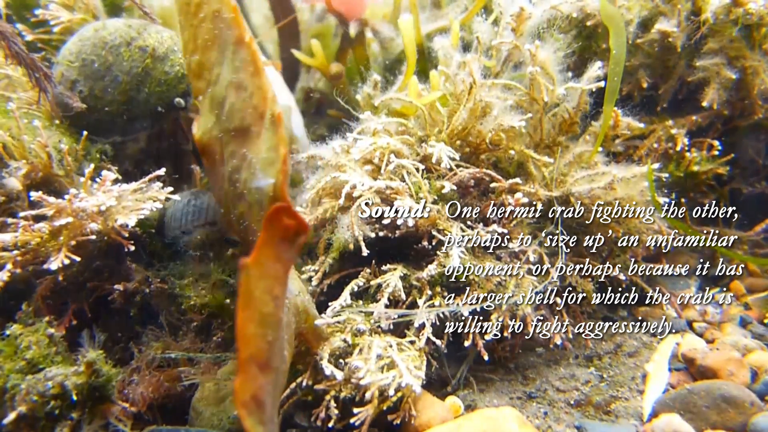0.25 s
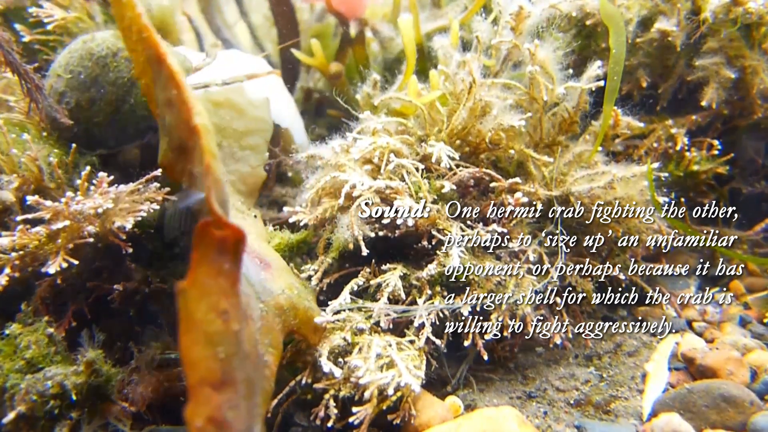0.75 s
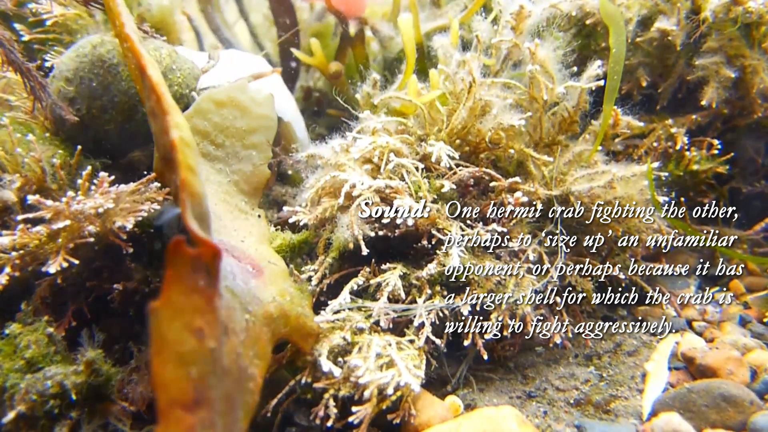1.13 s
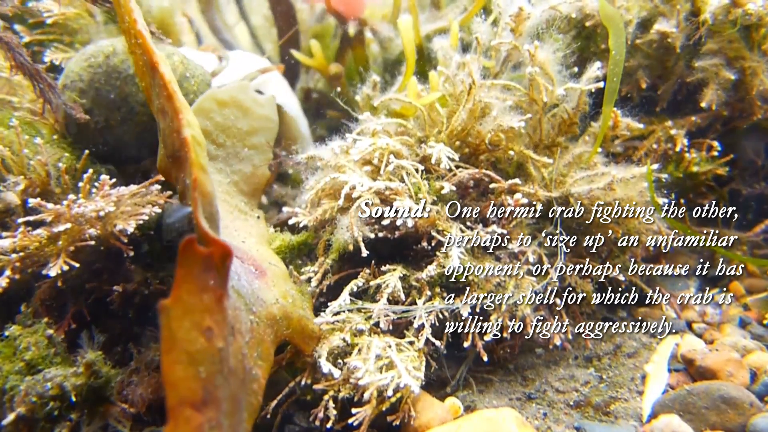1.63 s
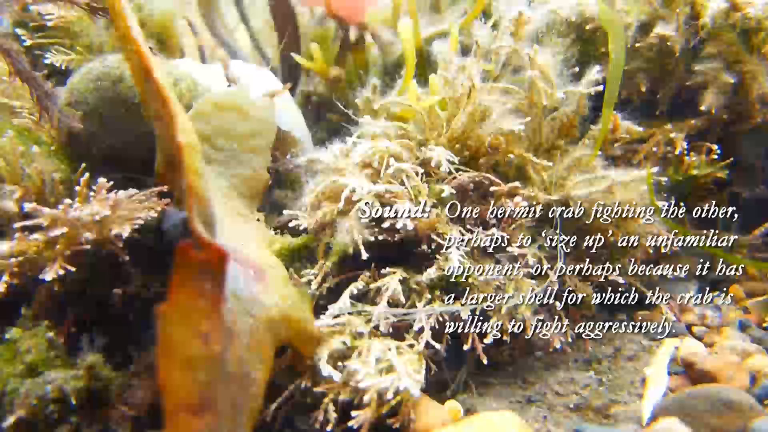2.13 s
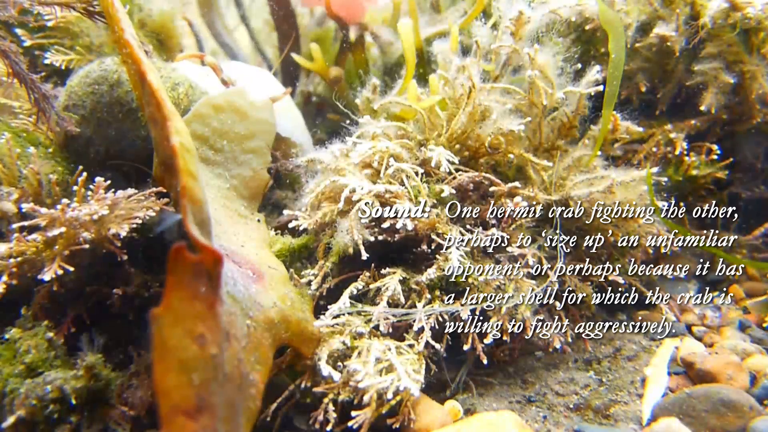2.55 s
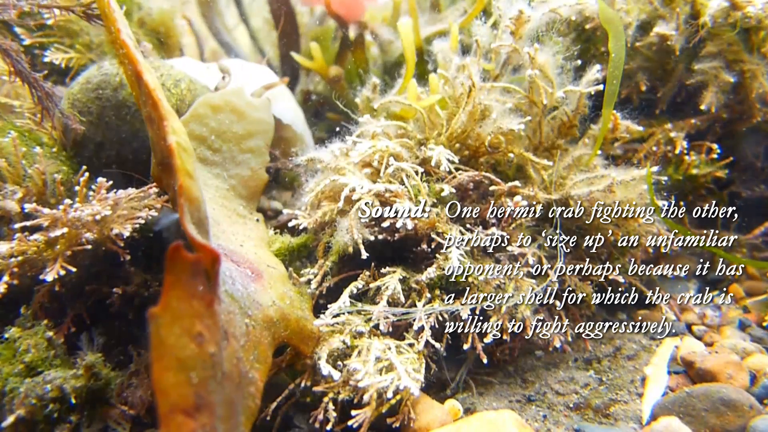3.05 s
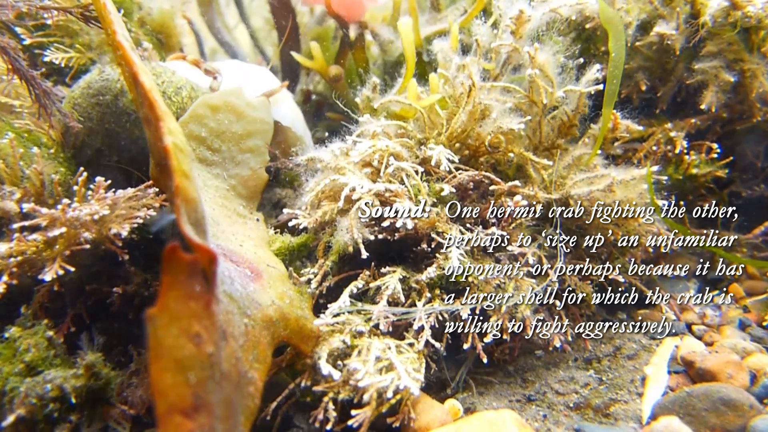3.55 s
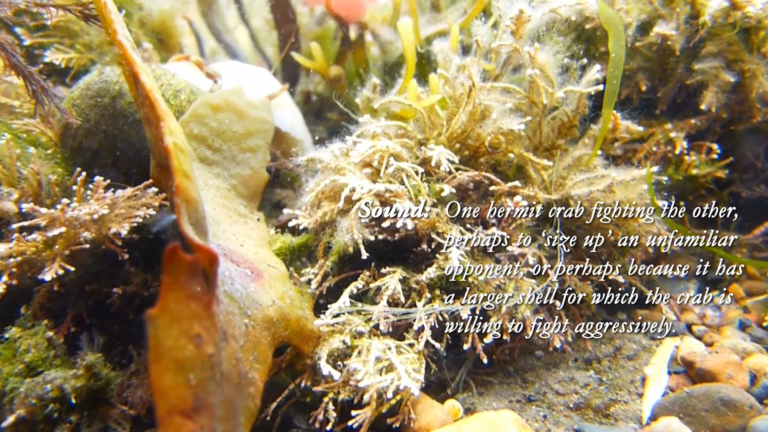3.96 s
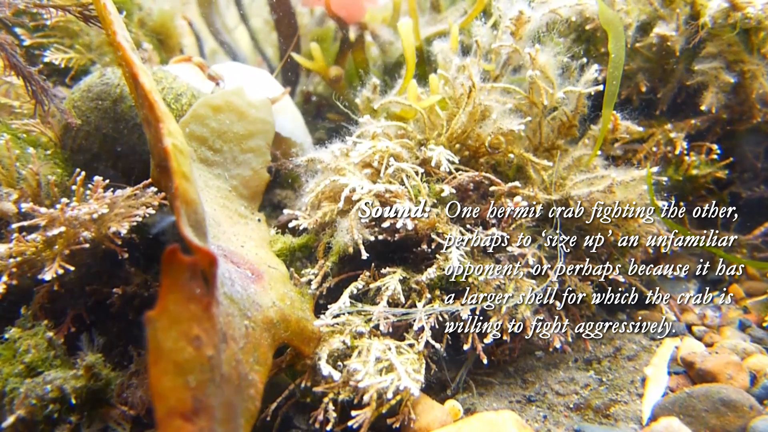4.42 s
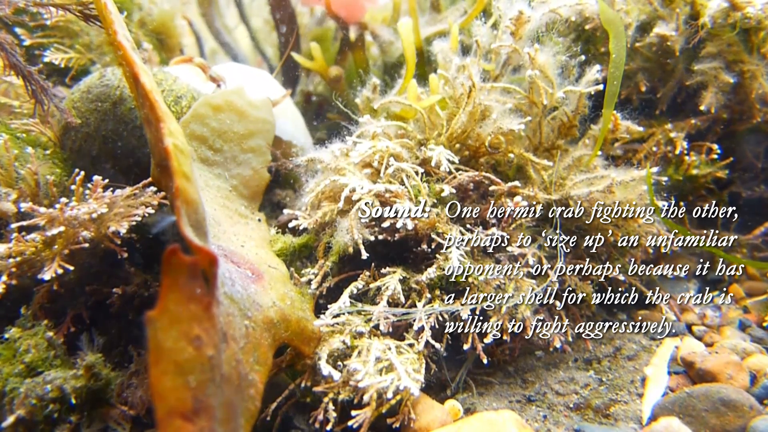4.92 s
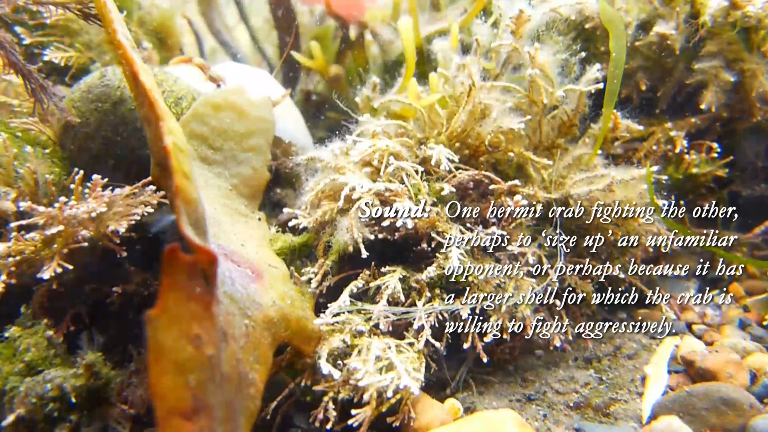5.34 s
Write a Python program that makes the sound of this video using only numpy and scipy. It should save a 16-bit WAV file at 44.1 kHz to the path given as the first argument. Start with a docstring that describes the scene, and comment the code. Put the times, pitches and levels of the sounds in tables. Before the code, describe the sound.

Sharp irregular clicks and taps of small hard shells knocking underwater, with faint leg scrapes over low water rumble and steady hiss.

```python
"""Small crabs wrestle in a rock pool, heard through an underwater microphone lying close by.
From the start: noise-made rumble and water, faint stirring of legs, electronic hiss with a breathy band.
Soon claws and borrowed shells tap (damped modes, often in quick clusters) and crack (clicks with noisy tails);
shoves send dull sagging pushes through the water, legs scrape in bouts, soft knocks ring shell hollows.
The strongest blows fall around two seconds; weaker taps and scrapes go on to the end."""
import sys
import numpy as np
from scipy import signal
from scipy.fft import rfft, irfft
from scipy.io import wavfile
from scipy.ndimage import uniform_filter1d, minimum_filter1d

SR = 44100
rng = np.random.default_rng(int(sys.argv[2]) if len(sys.argv) > 2 else 0)


def gain_from_db(level_db):
    """Convert decibel levels to linear amplitude factors (20 dB per decade)."""
    decades = np.asarray(level_db, float) / 20
    return 10 ** decades


def materialize(psi):
    """Save the field psi as 16-bit PCM at rate SR to the path in sys.argv[1].

    A 1-D psi becomes a single channel; in a 2-D psi each row is a channel.
    """
    bounded = np.clip(np.atleast_2d(psi).T, -1, 1)
    quanta = np.round(bounded * 32767).astype(np.int16)
    wavfile.write(sys.argv[1], SR, quanta)


N = 246519

# low heave of the water: start_s, level_db
SURGE_LEVELS = [(0, -43), (0.09, -58.5), (0.65, -59), (0.72, -50), (1.0, -57.5), (1.4, -62), (1.55, -55),
                (2.3, -54.5), (2.78, -66), (2.85, -53.5), (3.65, -61), (3.81, -50), (3.95, -53.5),
                (4.65, -60), (4.85, -50.5), (5.0, -62), (5.3, -58), (5.59, -61)]
# water noise: freq_hz, relative_density_db
WATER_SPECTRUM = [(350, -6.5), (815, -1), (1130, -5.5), (1330, -24), (1850, -17), (2450, -15.5),
                  (2900, -27.5)]
# bouts of legs scrabbling on shell: centre_s, length_s (falls to 1/e at 0.7 of it either side), level_db
SCRABBLE_BOUTS = [(0.226, 0.019, -48.5), (0.272, 0.011, -41), (0.317, 0.017, -51), (0.639, 0.018, -52),
                  (0.815, 0.041, -46), (1.163, 0.0074, -41.5), (1.32, 0.039, -45.5), (1.788, 0.026, -38.5),
                  (1.938, 0.024, -29), (1.988, 0.013, -39.5), (2.062, 0.029, -31.5), (2.193, 0.058, -40),
                  (2.256, 0.016, -34), (2.392, 0.026, -37.5), (2.506, 0.024, -43.5), (2.597, 0.011, -37.5),
                  (2.65, 0.078, -53.5), (2.878, 0.025, -46.5), (2.976, 0.055, -40), (3.07, 0.049, -42),
                  (3.124, 0.016, -39.5), (3.164, 0.018, -33), (3.239, 0.042, -43.5), (3.388, 0.034, -46.5),
                  (3.467, 0.026, -40.5), (3.58, 0.031, -37.5), (3.634, 0.016, -49), (3.798, 0.017, -47),
                  (3.898, 0.011, -49), (4.127, 0.035, -44.5), (4.234, 0.0077, -49), (4.428, 0.013, -41),
                  (4.583, 0.016, -49.5), (4.746, 0.025, -43.5), (4.913, 0.02, -46.5), (5.127, 0.018, -37.5),
                  (5.366, 0.027, -50), (5.554, 0.014, -38.5)]
# modes of the shell wall: freq_hz, relative_level_db, length_s (to about 70 dB under the peak)
WALL_MODES = [(1302, -0.5, 0.0057), (1790, 0, 0.0084), (2080, -2.5, 0.0061), (2326, -5.5, 0.0082),
              (2678, -7.5, 0.0078), (3050, -0.5, 0.0058)]
# modes of the shell's hollow: freq_hz, relative_level_db, length_s (as above)
HOLLOW_MODES = [(547, -12, 0.0079), (834, -1, 0.0094), (1026, -11, 0.0069)]
# preamplifier hiss: freq_hz, relative_density_db
HISS_SPECTRUM = [(300, -6.5), (3000, 1.5), (7300, 0), (15500, -1.5)]
# clear shell taps: start_s, wall_peak_db (before the microphone), ring_centre_hz
TAP_EVENTS = [(0.0685, -30, 1920), (0.1512, -29.5, 1700), (0.2806, -29, 1670), (0.3656, -15, 2160),
              (0.3811, -27, 1930), (0.388, -25.5, 1930), (0.4925, -38, 2400), (0.5604, -14.5, 2430),
              (0.588, -19, 1907), (0.78, -27.5, 1260), (0.808, -15, 1380), (0.8259, -27, 2220),
              (0.84, -27, 1350), (1.0833, -10, 2240), (1.252, -28.5, 1950), (1.2638, -9.5, 2140),
              (1.267, -12, 1970), (1.271, -14, 2080), (1.3054, -28, 2037), (1.5064, -6.5, 2220),
              (1.5969, -4.5, 2380), (1.6735, -7, 2040), (1.678, -15.5, 2000), (1.6825, -24, 1750),
              (1.7768, -19, 2410), (1.7807, -9.5, 2170), (1.784, -12.5, 2440), (1.9186, -6, 2160),
              (1.9228, -1, 2080), (1.9253, 15, 2180), (1.9302, -9, 2280), (1.9396, -12.5, 2100),
              (1.9508, -23, 1970), (1.9754, -33, 2250), (2.04, -25, 2070), (2.05, -5, 2250),
              (2.0558, -2.5, 2400), (2.0616, 8.5, 2250), (2.0662, -18, 1700), (2.069, -20, 1370),
              (2.1117, -23, 1610), (2.1319, -20, 1380), (2.1642, -8, 2080), (2.1835, -23, 2260),
              (2.2414, -21, 1390), (2.2541, -22, 1350), (2.3864, -28, 2000), (2.4215, -4, 2014),
              (2.427, -18, 1420), (2.4979, -40, 2150), (2.5811, -22, 1920), (2.597, -20, 1970),
              (2.654, -34, 2080), (2.671, -34.5, 2310), (2.8595, -23.5, 2500), (2.9569, -26, 1900),
              (2.9733, -24, 1850), (2.9777, -13.5, 1970), (2.9943, -11.5, 2230), (3.069, -16.5, 2170),
              (3.071, -23, 1890), (3.1544, -16, 2080), (3.1603, -18.5, 1930), (3.2165, -37, 1720),
              (3.2309, -30, 1740), (3.2449, -23.5, 1340), (3.3573, -14.5, 1960), (3.3724, -4.5, 2150),
              (3.469, -26, 1275), (3.4858, -3.5, 2030), (3.4946, -22.5, 2040), (3.538, -25, 1376),
              (3.566, -19, 1350), (3.5719, -18.5, 1340), (3.581, -14.5, 1970), (3.5849, -19, 2150),
              (3.6784, -20, 2010), (3.684, -11.5, 1990), (3.7968, -26, 2330), (3.8072, -32.5, 2040),
              (3.8712, -35, 1830), (3.8877, -28.5, 1480), (3.897, -24, 2230), (3.909, -29, 2000),
              (4.019, -24, 1930), (4.0231, -16, 2200), (4.0257, -17, 2020), (4.0295, -16.5, 2000),
              (4.0866, -38, 2390), (4.1077, -22.5, 2240), (4.1178, -25, 2170), (4.1265, -25.5, 1790),
              (4.1406, -24, 2000), (4.1784, -34.5, 2000), (4.2333, -35, 2080), (4.267, -24.5, 1966),
              (4.4203, -21, 2060), (4.445, -28.5, 1980), (4.576, -31, 2060), (4.7465, -16, 2060),
              (4.7527, -21, 2005), (4.8549, -33, 1560), (5.109, -23.5, 2040), (5.1175, -25.5, 1840),
              (5.133, -12.5, 2010), (5.2358, -20, 1990), (5.2534, -4, 2010), (5.3293, -30.5, 1790),
              (5.3583, -26.5, 2150), (5.3723, -32, 1790), (5.5562, -13.5, 2050), (5.568, -21, 1986),
              (5.578, -20, 1610)]
# hard edge-on contacts: start_s, peak_db (before the microphone)
CRACK_EVENTS = [(0.1517, -29.5), (0.3655, -25), (0.5612, -20), (1.0831, -16), (1.265, -22), (1.5064, -14.5),
                (1.597, -17.5), (1.6736, -23.5), (1.783, -27), (1.92, -28), (1.9315, -29), (1.958, -33),
                (2.051, -25), (2.055, -26.5), (2.064, -23), (2.1641, -26), (2.4212, -20.5), (2.9787, -18.5),
                (2.995, -26), (3.0685, -21), (3.3587, -29)]
# strong, dull shoves: start_s, peak_db (before the microphone), pitch_hz (passed about 1.2 cycles in)
SHOVE_EVENTS = [(0.164, -24.5, 122.4), (0.172, -21, 121), (0.174, -32, 327), (0.584, -29.5, 353),
                (1.176, -31.5, 260), (1.265, -27, 344), (1.93, -23, 320), (2.24, -26.5, 397),
                (2.251, -25.5, 200), (2.424, -22.5, 360), (2.845, -40, 108), (2.886, -29.5, 355),
                (3.158, -23, 373), (3.243, -26, 310), (3.286, -31.5, 285), (3.486, -31.5, 140),
                (3.594, -33, 266), (3.787, -35, 99), (3.829, -31.5, 181), (4.424, -28.5, 188),
                (4.875, -39, 125), (5.138, -27.5, 274), (5.24, -29, 230), (5.32, -35, 129),
                (5.385, -38, 104)]
# soft knocks on the hollow: start_s, peak_db (before the microphone)
KNOCK_EVENTS = [(0.283, -30.5), (0.632, -39), (0.646, -39), (1.612, -30), (2.014, -34), (2.084, -32),
                (2.562, -30), (2.94, -32), (3.39, -27), (3.409, -27), (3.486, -18.5), (4.729, -31),
                (4.855, -33), (5.359, -26)]


def rms_one(x):
    """Scale to unit rms."""
    return x / np.sqrt(np.mean(x ** 2) + 1e-20)


def drift(corner_hz):
    """Slow random wander of unit spread: noise through two equal low-pass poles."""
    step = 40  # samples per drawn point
    pole = np.exp(-2 * np.pi * corner_hz * step / SR)
    noise = rng.standard_normal(N // step + 2002)
    slow = signal.lfilter([1], [1, -2 * pole, pole ** 2], noise)[2000:]  # settled part
    return np.interp(np.arange(N) / step, np.arange(len(slow)), rms_one(slow))


def coloured(spectrum):
    """Unit-rms noise with the given spectrum, interpolated over log frequency."""
    hz, db = np.transpose(spectrum)
    bin_hz = np.maximum(np.arange(N // 2 + 1) * SR / N, 1)
    gain = gain_from_db(np.interp(np.log(bin_hz), np.log(hz), db))
    return rms_one(irfft(rfft(rng.standard_normal(N)) * gain, N))


def placed(start_s, shapes, peak_db):
    """Lay one short shape per event on the time line, each scaled to its peak."""
    length = shapes.shape[1]
    out = np.zeros(N + length)
    scaled = shapes / np.abs(shapes).max(axis=1, keepdims=True) * gain_from_db(peak_db)[:, None]
    first = np.round(start_s * SR).astype(int)
    np.add.at(out, first[:, None] + np.arange(length), scaled)
    return out[:N]


def struck(modes, lean_db, scatter_db):
    """One ring per blow: a soft contact swells each mode before the water damps it; strengths differ per blow."""
    hz, db, length_s = np.transpose(modes)
    t = np.arange(900)[:, None] / SR
    spent = 14 * t / length_s
    rings = spent ** 2 * np.exp(-spent + 2j * np.pi * hz * t)
    luck = rng.standard_normal((len(lean_db), 2, len(hz)))
    phase_rad = 0.4 * luck[:, 1]
    strength = gain_from_db(db + lean_db + scatter_db * luck[:, 0]) * np.exp(1j * phase_rad)
    return (strength @ rings.T).imag


def leaning(centre_hz, width_octaves):
    """The spot that is hit favours the wall modes near its centre."""
    octaves = np.log2(np.array(WALL_MODES)[:, 0] / centre_hz[:, None])
    return -np.minimum((octaves / width_octaves) ** 2, 21.0)


def surge():
    """Lumpy low rumble as the bodies heave the water about."""
    start_s, level_db = np.transpose(SURGE_LEVELS)
    rumble = coloured([(20, -47), (50, -11.5), (120, 0.5), (180, -5.5), (350, -38.0)])
    heave_db = np.interp(np.arange(N) / SR, start_s, level_db)
    return gain_from_db(heave_db + 4.3 * drift(23.0)) * rumble


def restless_water():
    """Coloured noise whose level wanders at two rates."""
    level_db = -53.5 + 2.26 * drift(16.3) + 3.5 * drift(40.0)
    return gain_from_db(level_db) * coloured(WATER_SPECTRUM)


def scrabble():
    """Dense faint touches ring shell, hollow and water, in bouts over a constant slight stirring."""
    t = np.arange(N) / SR
    effort = gain_from_db(-61.0)
    for centre_s, length_s, level_db in SCRABBLE_BOUTS:
        effort = effort + gain_from_db(level_db) * np.exp(-((t - centre_s) / (0.7 * length_s)) ** 2)
    draw = rng.random((2800, 4))
    start_s = draw[:, 0] * N / SR
    size_db = -4.2 * np.log(draw[:, 1] + 0.011)  # a few are much stronger
    centre_hz = 1150 * 2.24 ** draw[:, 2]
    wall = struck(WALL_MODES, leaning(centre_hz, 0.091), scatter_db=-1.0)
    hollow = struck(HOLLOW_MODES, np.zeros((len(start_s), 1)), scatter_db=11.5)
    touch = rms_one(placed(start_s, wall, size_db))
    body = rms_one(placed(start_s, hollow, size_db + 8.3 * draw[:, 3]))
    low = coloured([(80, -16.5), (200, 3), (450, -5.0), (1000, -35.5)])
    lumps = rms_one(low * gain_from_db(4.3 * np.tanh(drift(22.5))))
    return effort * (touch + gain_from_db(-2.0) * body + gain_from_db(-3.5) * lumps)


def preamp_hiss():
    """Steady electronic noise, steeply cut to 40 dB down at 15.9 kHz."""
    cut = signal.cheby2(14, 40, 15900, fs=SR, output="sos")
    return gain_from_db(-54) * signal.sosfilt(cut, coloured(HISS_SPECTRUM))


def whistle():
    """A faint breathy band in the treble of the hiss, its centre wandering slowly."""
    centre_hz = 9000 + 350 * drift(3.7)
    lowpass = signal.butter(2, 250, fs=SR, output="sos")
    breath = signal.sosfilt(lowpass, rng.standard_normal(N))
    carrier = np.sin(2 * np.pi * np.cumsum(centre_hz) / SR)
    return gain_from_db(-67.0) * rms_one(breath * carrier)


def taps():
    """Each tap rings the shell wall and, usually more weakly, its hollow, which answers duller taps more."""
    start_s, peak_db, centre_hz = np.transpose(TAP_EVENTS)
    dull_octaves = np.log2(2000 / centre_hz)
    luck_db = 2.5 * rng.standard_normal(len(start_s))
    hollow_db = -16.5 + 0.68 * peak_db + 7.5 * dull_octaves + luck_db
    wall = struck(WALL_MODES, leaning(centre_hz, 0.05), scatter_db=2.5)
    hollow = struck(HOLLOW_MODES, np.zeros((len(start_s), 1)), scatter_db=7.0)
    return placed(start_s, wall, peak_db) + placed(start_s, hollow, hollow_db)


def cracks():
    """A needle-like click with a brief ragged tail, falling towards the treble."""
    start_s, peak_db = np.transpose(CRACK_EVENTS)
    t = np.arange(120) / SR
    tail = rng.standard_normal((len(start_s), len(t))) * gain_from_db(-60 * t / 0.0013)
    burst = (t == 0) + 2.5 * tail
    body = signal.sosfilt(signal.butter(2, [2900, 5200], "band", fs=SR, output="sos"), burst)
    edge = signal.sosfilt(signal.butter(1, [4500, 13000], "band", fs=SR, output="sos"), burst)
    return placed(start_s, body + 0.14 * edge, peak_db)


def shoves():
    """A low push of about two cycles whose pitch sags a little as it dies."""
    start_s, peak_db, pitch_hz = np.transpose(SHOVE_EVENTS)
    cycles = np.arange(2600) / SR * pitch_hz[:, None]
    turns = 1.12 * cycles / (1 + 0.048 * cycles) + rng.random((len(start_s), 1))
    push = cycles * np.exp(-1.6 * cycles) * np.sin(2 * np.pi * turns)
    return placed(start_s, push, peak_db)


def knocks():
    """A blunt touch misses the wall modes and sounds the hollow alone."""
    start_s, peak_db = np.transpose(KNOCK_EVENTS)
    hollow = struck(HOLLOW_MODES, np.zeros((len(start_s), 1)), scatter_db=5.0)
    return placed(start_s, hollow, peak_db)


def scene():
    """Crabs over the restless water; the microphone drops the deepest bass."""
    background = surge() + restless_water()
    crabs = scrabble() + taps() + cracks() + shoves() + knocks()
    bass_cut = signal.butter(2, 38, "high", fs=SR, output="sos")
    return signal.sosfilt(bass_cut, background + crabs)[None]


def limited(x):
    """Limiter: a smoothed gain dip about each peak holds the loudest blows under full scale."""
    allowed = minimum_filter1d(1 / np.maximum(np.abs(x), 1), size=61)
    return x * uniform_filter1d(allowed, size=61) * 0.97


def roll_off(x):
    """The treble ends steeply here."""
    return signal.sosfilt(signal.butter(12, 16810, fs=SR, output="sos"), x)


def record(dry):
    """The limiter acts on the pool; the preamplifier's hiss and breathy band are added after it."""
    mix = limited(dry) + preamp_hiss() + whistle()
    return roll_off(mix)


dry = scene()
out = record(dry)
materialize(out)
```